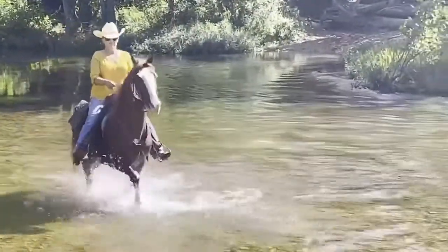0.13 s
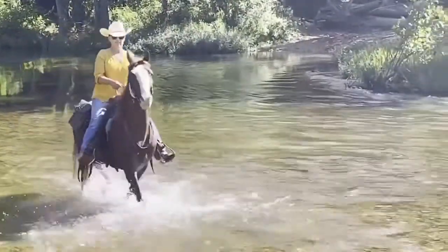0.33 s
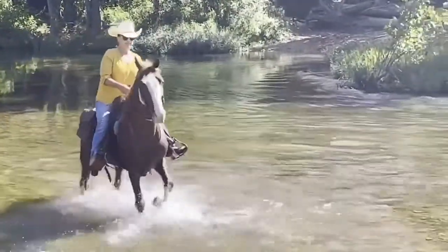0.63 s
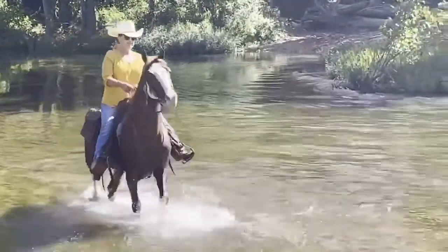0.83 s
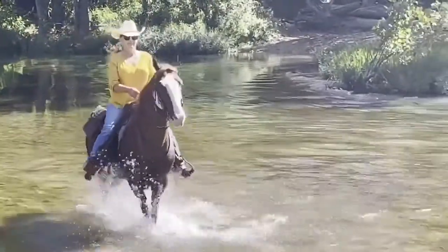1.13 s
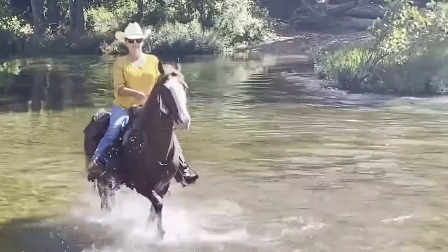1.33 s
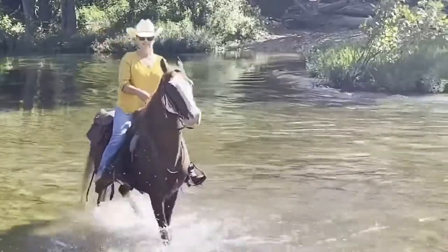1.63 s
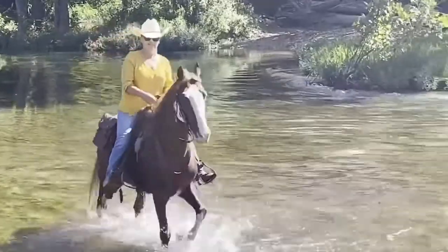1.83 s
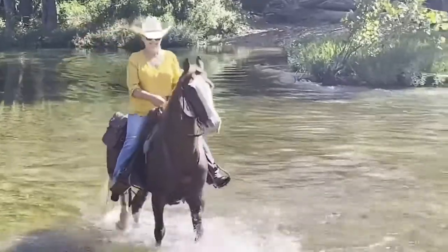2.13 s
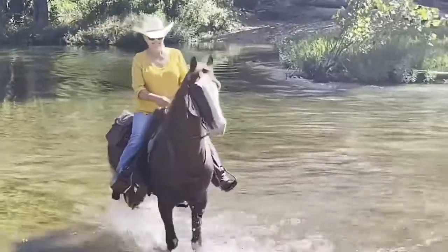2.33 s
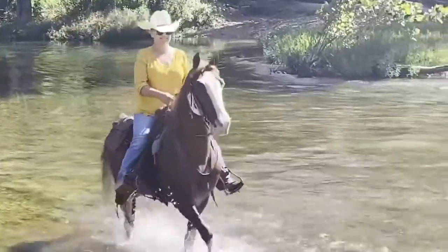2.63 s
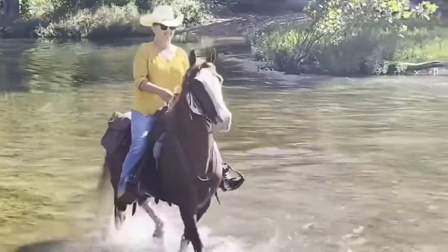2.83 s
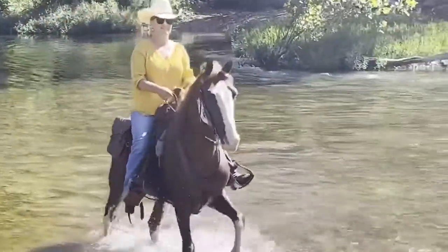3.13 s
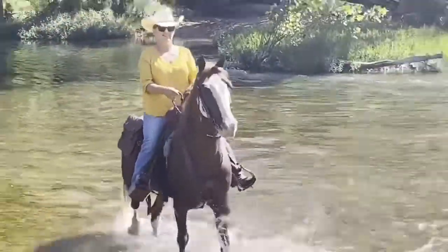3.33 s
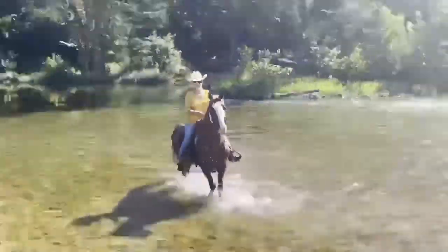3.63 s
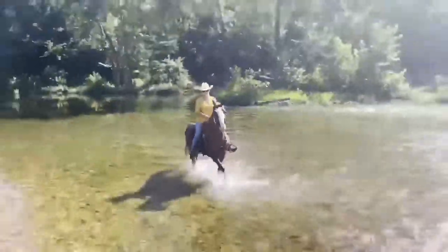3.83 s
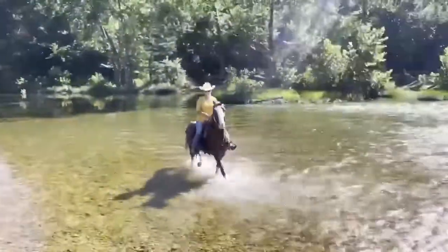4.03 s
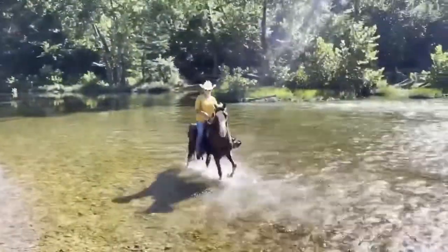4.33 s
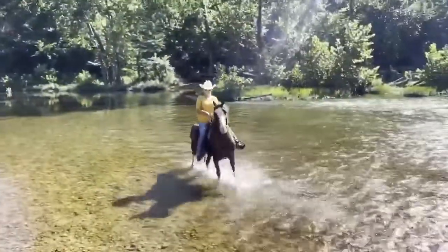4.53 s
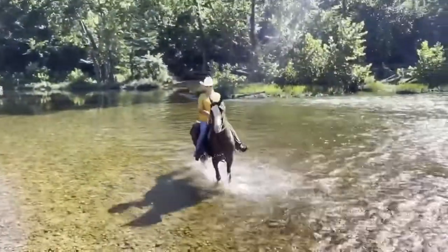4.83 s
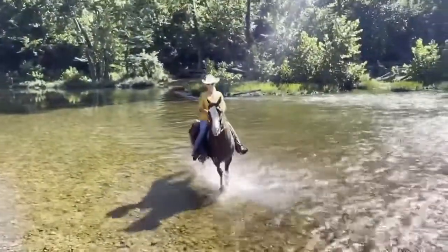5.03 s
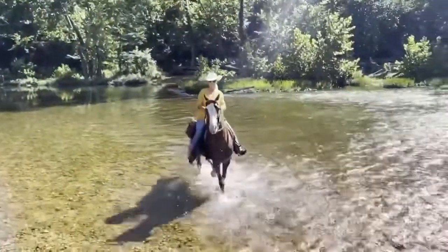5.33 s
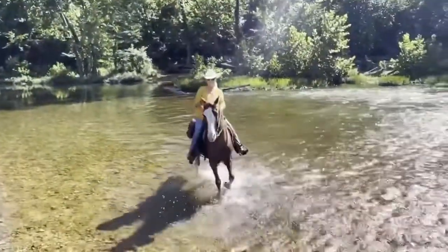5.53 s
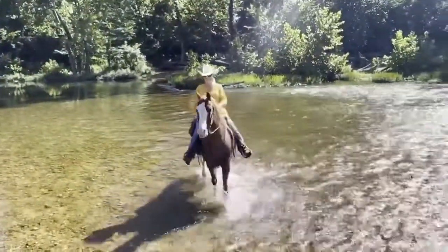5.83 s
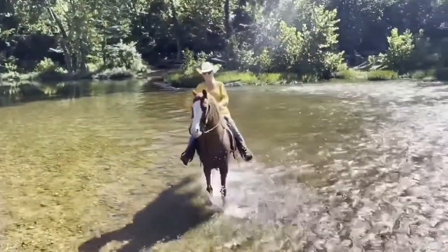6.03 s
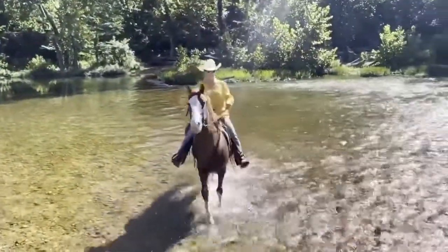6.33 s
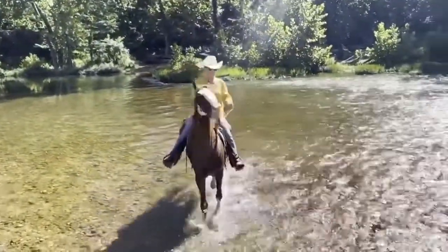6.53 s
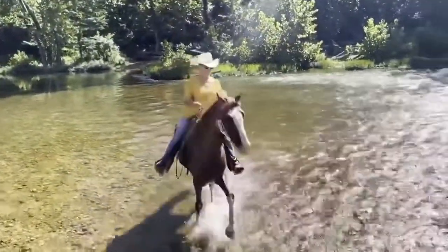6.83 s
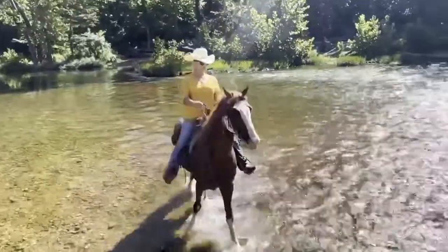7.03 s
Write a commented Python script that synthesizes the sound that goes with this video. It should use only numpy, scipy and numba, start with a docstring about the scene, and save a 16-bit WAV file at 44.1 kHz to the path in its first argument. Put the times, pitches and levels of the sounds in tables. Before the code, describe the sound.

A horse trots through a shallow creek, its hooves splashing and gulping in a steady rhythm over bubbling water.

```python
"""A horse trots through a shallow creek. Each hoof punches air into the water: big pockets gulp,
clouds of ringing bubbles thump and slosh, and thrown water slaps back in bursts of noise, with
drops and a fizzing mist on top. The creek keeps bubbling between steps, and a light wind rumbles
on the microphone. About halfway the listening spot changes, shifting the tone and stereo width."""
import sys
import numpy as np
from scipy import signal
from scipy.fft import rfft, irfft, next_fast_len
from scipy.io import wavfile
from scipy.ndimage import uniform_filter1d
from numba import njit

SR = 44100
rng = np.random.default_rng(int(sys.argv[2]) if len(sys.argv) > 2 else 0)


def persist_wave(psi):
    """Save psi, clipped to +-1, as 16-bit WAV."""
    counts = np.round(np.clip(psi, -1, 1) * 32767).astype(np.int16)
    wavfile.write(sys.argv[1], SR, np.atleast_2d(counts).T)


N = 316466
TIME_S = np.arange(N) / SR
CONTROL_S = np.arange(0, N / SR + .01, 1 / 500)  # coarse clock for envelopes


def gain_of(db):
    """Decibels as a linear gain."""
    return 10 ** (np.asarray(db) / 20)


def unit_rms(x):
    """Normalises to an RMS of one."""
    return x / np.sqrt(np.mean(x ** 2) + 1e-20)


def equalise(x, curve):
    """An EQ of straight dB lines on a log-frequency axis."""
    size = next_fast_len(N)
    curve_hz, curve_db = np.transpose(curve)
    hz = np.fft.rfftfreq(size, 1 / SR)
    eq_db = np.interp(np.log(hz + 1), np.log(curve_hz + 1), curve_db)
    return irfft(rfft(x, size) * gain_of(eq_db), size)[..., :N]


def faders(rows):
    """One gain per sample for each level column of a timed table."""
    times, *levels_db = np.transpose(rows)
    return [gain_of(np.interp(TIME_S, times, db)) for db in levels_db]


def envelope(power):
    """Power on the coarse clock as a gain per sample."""
    return np.interp(TIME_S, CONTROL_S, np.sqrt(power))


def bubble(hz, length_s, rise, phase):
    """Trapped air rings: it swells quickly, dies slower and climbs in pitch as it nears the surface."""
    half = round(2 * length_s * SR)
    age = np.arange(-half, half + 1) / (length_s * SR)  # in lengths, zero at the peak
    shape = np.exp(-4 * np.log(2) * (age / np.where(age < 0, .8, 1.25)) ** 2)
    return shape * np.cos(2 * np.pi * hz * length_s * (age + rise * age ** 2 / 2) + phase)


@njit
def add_rings(out, starts, kinds, gains, bank, lengths):
    """Mixes each chosen bubble in at its start sample."""
    for n in range(len(starts)):
        for k in range(lengths[kinds[n]]):
            out[starts[n] + k] += gains[n] * bank[kinds[n], k]


def bubble_cloud(low_hz, high_hz, per_s, cycles, rise, spread_db, count=40):
    """Bubbles ringing at random moments, a few of them loud: one cloud for mid, one for side."""
    pitches = np.geomspace(low_hz, high_hz, count)
    rings = [bubble(hz, cycles * (.6 + 0.72 * stretch) / hz, rise, 2 * np.pi * turn)
             for hz, (stretch, turn) in zip(pitches, rng.random((count, 2)))]
    lengths = np.array([len(ring) for ring in rings])
    pad = lengths.max()
    bank, out = np.zeros((count, pad)), np.zeros((2, N + 2 * pad))
    for k, ring in enumerate(rings):
        bank[k, :len(ring)] = ring * np.sqrt(pitches[k]) / np.linalg.norm(ring)  # equal power per Hz
    for channel in out:
        when, kind, size = rng.random((round(per_s * N / SR), 3)).T
        starts, kinds = (when * (N + pad)).astype(np.int64), (kind * count).astype(np.int64)
        gains = gain_of(spread_db * np.minimum(-np.log(1 - size), 5))
        add_rings(channel, starts, kinds, gains, bank, lengths)
    return out[:, pad:pad + N]


def swells(times, peaks_db, decay_s, attack_s=0.042, range_db=12.5, hold=1.18):
    """Power of a run of hits: each climbs range_db over its attack and loses it over its decay."""
    age = CONTROL_S[:, None] - times
    fall = np.where(age < 0, -age / attack_s, abs(age / np.maximum(decay_s, .01)) ** hold)
    return (gain_of(peaks_db - range_db * fall) ** 2).sum(1)


# Hoof hits on the trot beat, with weaker hind hooves and drags between:
# (time [s], decay [s], thump level [dB], gulp level [dB], slosh level [dB], drop level [dB])
HOOF_HITS = [(0.005, 0.067, -44, -36.5, -43, -61), (0.09, 0.23, -53.5, -43, -60, -54),
             (0.3, 0.31, -48.5, -37.5, -49, -57), (0.515, 0.033, -45, -41, -58, -63),
             (0.57, 0.055, -36, -35, -48, -49), (0.92, 0.15, -47.5, -40, -56, -46),
             (1.14, 0.27, -40.5, -42, -39, -45), (1.23, 0.11, -52, -40, -45, -62),
             (1.32, 0.051, -40, -54, -54, -45), (1.46, 0.26, -44, -43.5, -48, -63),
             (1.62, 0.044, -57, -38, -53, -41), (1.78, 0.13, -42, -36.5, -42.5, -65),
             (2.102, 0.15, -45, -36.5, -46, -61), (2.16, 0.099, -57, -37, -50, -60),
             (2.37, 0.18, -45.5, -36.5, -44, -44), (2.57, 0.31, -55, -45.5, -45.5, -56),
             (2.71, 0.23, -43, -38, -43, -57), (2.98, 0.2, -44, -33.5, -35.5, -54),
             (3.04, 0.077, -58, -29.5, -38, -61), (3.34, .1, -51, -40, -45, -45),
             (3.44, 0.085, -48, -35, -55, -62), (3.575, 0.32, -51, -32, -38.5, -41.5),
             (3.65, 0.063, -44, -40, -38, -55), (3.76, 0.13, -60, -58, -47, -41.5),
             (4.02, 0.17, -51, -43.5, -47, -61), (4.08, .1, -58, -44, -44, -60),
             (4.25, 0.21, -39.5, -34, -50, -42.5), (4.329, 0.047, -35.5, -27.5, -39, -48),
             (4.576, 0.11, -43, -34, -37, -41), (4.66, 0.072, -51, -39.5, -57, -61),
             (4.84, 0.17, -45.5, -35, -38, -43), (4.92, 0.22, -41, -55, -64, -52),
             (5.07, 0.038, -57, -63, -39, -44), (5.18, 0.21, -41.5, -41, -52, -37.5),
             (5.435, 0.079, -46, -45, -42, -43), (5.479, 0.32, -48, -34, -36, -47),
             (5.6, 0.22, -64, -36, -62, -68), (5.68, 0.033, -63, -37, -42, -62),
             (5.83, 0.082, -40.5, -35, -41, -53), (5.92, 0.1, -49, -49, -61, -62),
             (5.98, 0.034, -49, -50, -61, -56), (6.101, 0.078, -44, -30.5, -40, -46),
             (6.2, 0.087, -41.5, -42, -40, -48), (6.42, 0.2, -49, -32, -40, -39),
             (6.54, 0.11, -60, -42, -46, -60), (6.62, 0.057, -64, -39, -39.5, -43),
             (6.73, 0.25, -47, -37.5, -43, -44.5), (6.84, 0.042, -48, -42, -46, -54),
             (6.915, 0.045, -53, -51, -54, -41), (6.949, 0.37, -42, -35.5, -37, -36.5)]


def hoof_plunges():
    """Power the hooves put into each bubble layer: big bubbles come later and outlast small ones."""
    times, decay_s, *layers_db = np.transpose(HOOF_HITS)
    decay_shares, lags_s = (0.67, 0.52, 0.37, 0.24), (-0.0019, 0.00066, -0.011, -0.0095)
    return [swells(times + lag_s, db, decay_s * share)
            for db, share, lag_s in zip(layers_db, decay_shares, lags_s)]


def lapping(depth_db=1.5, lap_s=0.056):
    """A wandering gain: small sloshes make the calm water come and go."""
    window = np.exp(-(np.linspace(-.2, .2, num=201) / lap_s) ** 2)
    wander = np.convolve(rng.standard_normal(len(CONTROL_S)), window, "same")
    return envelope(gain_of(depth_db * unit_rms(wander)) ** 2)


def patchy_shimmer(x, depth_db=1.76, full_above_hz=910):
    """A patchy shimmer in the upper water sound: small random patches of pitch and time swell and fade."""
    hz, _, spectrum = signal.stft(x, SR, nperseg=1024)
    noise = rng.standard_normal(spectrum.shape[1:])
    patches = unit_rms(uniform_filter1d(uniform_filter1d(noise, size=4, axis=0), size=4, axis=1))
    patches_db = depth_db * np.clip(hz / full_above_hz, 0, 1)[:, None] * patches
    _, shimmering = signal.istft(spectrum * gain_of(patches_db), SR, nperseg=1024)
    return unit_rms(shimmering[:, :N]) * np.sqrt(np.mean(x ** 2))


# Bubble layers, from low body to top sparkle:
# (lowest [Hz], highest [Hz], density [1/s], nominal ring [cycles], pitch rise [share], spread [dB])
THUMPS = (100.4, 194.4, 250, 2.8, 0.17, 0.35)
GULPS = (210, 613.5, 700, 4.5, 0.22, 3.66)
SLOSH = (582.5, 1498, 1500, 3.45, 0.25, 1.23)
DROPS = (1450, 4700, 5000, 6.5, 0.17, 1.2)
PLINKS = (951, 4800, 270, 12, 0.042, 5.8)  # sparse drops that ring longer
MIST = (3980, 10470, 30000, 5.6, 0.34, 1.7)
# Tone of the mist: (frequency [Hz], gain [dB])
MIST_EQ = [(4000, 4.5), (5200, 2.5), (6600, 3), (7600, -7.5), (9400, -13), (10400, -4.5), (11500, -0.5)]
# The bed of water between plunges:
# (time [s], thump level [dB], gulp level [dB], slosh level [dB], drop level [dB], mist level [dB])
WATER_BED = [(0.0, -68, -46, -46, -45.5, -49), (0.2, -60, -50.5, -44, -44.5, -47.5),
             (0.55, -60, -46, -44, -45.5, -48), (0.86, -53, -47.5, -43, -43.5, -48),
             (1.04, -62, -42, -46.5, -45.5, -48), (1.4, -60, -47.5, -44.5, -43.5, -47.5),
             (1.84, -45, -46.5, -45.5, -45, -48), (2.21, -55, -48.5, -46, -46, -50.5),
             (2.81, -58, -48.5, -44.5, -42, -46), (3.31, -61, -48, -45, -47, -51.5),
             (3.53, -48, -44.5, -45, -45, -50), (3.83, -57, -48.5, -40.5, -46, -48.5),
             (4.53, -56, -49.5, -46, -46, -49.5), (5.01, -64, -48, -43, -44, -47.5),
             (6.09, -54, -50, -46, -45.5, -48), (6.51, -58, -49.5, -43, -44.5, -48),
             (7.17, -63, -39.5, -42, -47, -50)]


def churning_water(plink_db=-12, mist_follow=0.66):
    """Four bubble layers surge with the hooves; plinks ride the drops, and the mist partly follows."""
    surges = hoof_plunges()
    surges[-1] = surges[-1] + slap_showers()
    *beds, mist_bed = faders(WATER_BED)
    gains = [np.hypot(bed * lapping(), envelope(power)) for bed, power in zip(beds, surges)]
    drop_gain, drop_bed = gains[-1], beds[-1]
    bubbles = sum(water_tone(bubble_cloud(*layer)) * gain
                  for layer, gain in zip([THUMPS, GULPS, SLOSH, DROPS], gains))
    plinks = gain_of(plink_db) * water_tone(bubble_cloud(*PLINKS)) * drop_gain
    water = patchy_shimmer(bubbles + plinks)
    mist = unit_rms(equalise(bubble_cloud(*MIST), MIST_EQ))
    return water + mist * mist_bed * (drop_gain / drop_bed) ** mist_follow


# Tone of the water at each listening spot: (frequency [Hz], gain [dB])
FIRST_SPOT_EQ = [(60, -9), (100, -13), (160, -1.5), (300, -3.5), (430, -3), (600, -8), (1100, -8),
                 (1420, -16), (1900, -5), (2300, -8.5), (3600, -10), (5000, -20.5)]
SECOND_SPOT_EQ = [(60, -28), (100, -19.5), (160, -5), (300, 0.5), (430, -1), (600, -9.5), (1100, -11),
                  (1300, -13), (1480, -20.5), (1680, -11), (2300, -7.5), (2750, -9), (5000, -15)]


def water_tone(x):
    """Colours the bubbles for each spot, with a dip from the bounce off the surface."""
    return change_spot(unit_rms(equalise(x, FIRST_SPOT_EQ)), unit_rms(equalise(x, SECOND_SPOT_EQ)))


# Gusts: (time [s], level [dB])
GUSTS = [(0.0, -60), (0.56, -59), (0.58, -47), (0.76, -60), (1.2, -63), (1.3, -53), (1.4, -68),
         (1.44, -56.5), (2.14, -57), (2.25, -61), (2.29, -50.5), (2.72, -56), (3.01, -39.5), (3.15, -58),
         (3.33, -40.5), (3.43, -55), (3.51, -39), (3.57, -49.5), (5.39, -55.5), (6.27, -53), (7.13, -60),
         (7.17, -61)]
# Tone of the rumble: (frequency [Hz], gain [dB])
RUMBLE_EQ = [(12, -50), (20, -12), (48, 13), (92, 7), (130, -3.5), (170, -26), (290, -120)]


def wind():
    """Gusts push low, lumpy pressure onto the microphone."""
    rumble = unit_rms(equalise(rng.standard_normal((2, N)), RUMBLE_EQ))
    return rumble * faders(GUSTS)[0]


# Featured air pockets: (peak time [s], pitch [Hz], level [dB], length at half height [ms])
AIR_POCKETS = [(0.012, 226, -31.5, 16), (0.128, 3160, -34, 2), (0.152, 680, -37, 7.3),
               (0.287, 890, -31, 4.3), (0.299, 2000, -35, 3), (0.293, 265, -22.5, 5.4),
               (0.557, 299, -17, 9.6), (0.566, 814, -33, 5.9), (0.585, 324, -27, 26),
               (0.732, 4460, -34, 2.3), (0.752, 1710, -33, 5), (0.752, 1060, -34, 4),
               (0.878, 284, -26.5, 6.2), (0.917, 340, -30, 6), (0.939, 280, -26, 12), (0.954, 310, -32, 8),
               (0.976, 307, -30.5, 15), (1.004, 300, -34, 7), (1.058, 2480, -32, 2.5),
               (1.129, 288, -21.5, 12.3), (1.139, 448, -29, 10), (1.161, 233, -33, 22),
               (1.282, 3350, -30, 1.2), (1.51, 1860, -28, 2.7), (1.539, 2100, -33, 2.1),
               (1.634, 2510, -31, 1.5), (1.635, 948, -32, 3.8), (1.668, 1130, -31, 2.3),
               (1.668, 2000, -31, 2), (1.719, 208, -28.5, 8.9), (1.746, 1830, -36, 5.5),
               (1.76, 510, -28.5, 12), (1.776, 436, -29, 14), (1.777, 223, -28.5, 18),
               (1.811, 242, -31.5, 18), (1.832, 428, -29.5, 9.6), (1.928, 1170, -25, 3.5),
               (2.081, 285, -24.5, 7.3), (2.103, 905, -31, 6), (2.103, 490, -29, 6), (2.104, 250, -27, 8),
               (2.105, 666, -26.5, 8), (2.131, 670, -33, 10), (2.135, 323, -30.5, 20), (2.155, 318, -28, 8),
               (2.354, 2120, -28.5, 1.8), (2.357, 905, -25, 4.5), (2.357, 467, -25.5, 6.2),
               (2.381, 550, -35, 9.5), (2.397, 217, -31, 15), (2.548, 3750, -35, 1.6),
               (2.645, 1890, -34, 3.1), (2.656, 3900, -33, 1.6), (2.692, 401, -37, 8.9),
               (2.693, 1070, -36, 9), (2.722, 645, -31, 5.8), (2.73, 286, -29.5, 23),
               (2.738, 3540, -32, 1.6), (2.744, 319, -36, 9.2), (2.765, 846, -33, 4.9),
               (2.826, 2330, -25, 1.1), (2.964, 1870, -27, 3.5), (2.964, 4400, -36, 3),
               (2.967, 464, -20.5, 4.7), (2.968, 1950, -22.5, 1.6), (2.983, 305, -23, 7.1),
               (2.999, 464, -27, 9.9), (3.019, 318, -29, 31), (3.327, 293, -25, 11), (3.352, 290, -30, 10),
               (3.367, 285, -25.5, 10), (3.39, 487, -33, 11), (3.532, 147, -31, 16),
               (3.557, 2000, -22.5, 5.6), (3.558, 524, -15.5, 2.6), (3.571, 546, -19.5, 8.7),
               (3.572, 960, -27, 7.2), (3.58, 255, -18.5, 7.6), (3.604, 260, -25.5, 10),
               (3.626, 1160, -30.5, 9), (3.63, 270, -32, 14), (3.659, 300, -27, 9.7), (3.784, 1600, -34, 4),
               (3.987, 4300, -33.5, 3.6), (3.996, 1340, -35, 3.5), (4.021, 400, -37.5, 20),
               (4.069, 635, -32, 6.4), (4.128, 530, -31.5, 5.9), (4.251, 1890, -30, 1.6),
               (4.253, 1066, -23.5, 11), (4.253, 500, -20.5, 5.5), (4.257, 268, -31, 18),
               (4.322, 513, -30, 14), (4.571, 2460, -21.5, 2.4), (4.604, 650, -32, 9),
               (4.605, 314, -26, 16), (4.656, 319, -35, 9.7), (4.802, 905, -32.5, 8),
               (4.84, 2120, -29, 2.6), (4.82, 358, -34, 17), (4.852, 300, -26, 12), (4.869, 190, -36, 11),
               (4.886, 1630, -30.5, 5.5), (4.91, 270, -33, 18), (4.932, 205, -36, 15),
               (4.942, 2820, -32, 1.6), (5.04, 1550, -36, 6), (5.116, 2370, -34, 2.5),
               (5.18, 3970, -23.5, 5.6), (5.178, 170, -30, 9), (5.18, 260, -32, 7), (5.196, 416, -34, 14),
               (5.438, 680, -30, 7.8), (5.452, 170, -36, 14), (5.47, 910, -26.5, 7.8),
               (5.478, 230, -31, 6.7), (5.487, 466, -28, 3.9), (5.521, 4430, -29, 1), (5.553, 334, -34, 14),
               (5.592, 428, -31, 7.6), (5.635, 300, -30.5, 13), (5.653, 2510, -35, 2),
               (5.674, 322, -34, 16), (5.751, 290, -37, 9), (5.78, 645, -33, 8), (5.783, 310, -29, 5),
               (5.78, 2240, -27.5, 1.6), (5.788, 168, -29, 8), (5.822, 1000, -32, 5.5),
               (5.832, 404, -21, 16), (5.877, 295, -31.5, 12), (5.94, 407, -37.5, 32),
               (5.976, 2000, -32, 2.2), (6.063, 2610, -28, 1.1), (6.086, 1220, -32, 4),
               (6.093, 328, -29, 8), (6.1, 630, -30, 8), (6.113, 570, -25, 6), (6.114, 312, -21, 12.4),
               (6.118, 174, -32, 15), (6.232, 712, -36.5, 7.6), (6.298, 263, -35, 15),
               (6.395, 323, -24.5, 4), (6.393, 1200, -33.5, 9), (6.404, 770, -23.5, 7), (6.41, 310, -29, 9),
               (6.414, 600, -30, 8), (6.422, 3750, -27, 1.6), (6.429, 770, -27.5, 9.7),
               (6.432, 450, -25, 7.3), (6.434, 1840, -24, 1.2), (6.45, 3970, -23.5, 0.51),
               (6.454, 390, -31, 11), (6.468, 590, -26, 7), (6.486, 387, -23.5, 16), (6.522, 360, -33, 19),
               (6.56, 423, -34, 9.6), (6.62, 417, -33, 11), (6.71, 430, -33, 14), (6.743, 2380, -32, 2.5),
               (6.744, 865, -24, 6), (6.751, 213, -38, 20), (6.801, 231, -31.5, 14), (6.808, 500, -31.5, 8),
               (6.861, 337, -35, 16.5), (6.915, 1190, -30, 3.5), (6.919, 2000, -37, 1.8),
               (6.92, 266, -30, 9.9), (6.941, 3800, -17, 1.04), (6.944, 4080, -22, 2.6),
               (6.941, 1070, -19.5, 1.7), (6.947, 3030, -27, 2.5), (6.942, 5200, -30, 1.2),
               (6.952, 2170, -27, 5.4), (6.954, 1085, -20, 5.5), (6.958, 504, -21, 6.4),
               (6.962, 3970, -26, 1.8), (6.968, 1004, -29, 4.8), (6.976, 1230, -29, 4.4),
               (6.999, 940, -31, 9), (7.011, 353, -29.5, 26), (7.025, 387, -24.5, 9),
               (7.049, 3800, -28.5, 1.5), (7.084, 224, -28, 14), (7.155, 292, -33, 8.8)]


def air_pockets(shed_db=-12, shed_spread=0.23, shake_depth=0.19, shake_s=0.0039):
    """Pockets dragged under by a hoof ring with shaking walls; each sheds a weaker one of nearby pitch."""
    out, draws = np.zeros(N + 2 * SR), rng.random((len(AIR_POCKETS), 4))
    smooth = round(shake_s * SR)
    shake = unit_rms(uniform_filter1d(uniform_filter1d(rng.standard_normal(N), smooth), smooth))
    for (time_s, hz, db, ms), (turn, shed_turn, detune, late) in zip(AIR_POCKETS, draws):
        shed_s = time_s + (.5 + late) * ms / 1000
        shed_hz = hz * (1 + shed_spread * (2 * detune - 1))
        pair = [(time_s, hz, db, turn), (shed_s, shed_hz, db + shed_db, shed_turn)]
        for peak_s, ring_hz, ring_db, ring_turn in pair:
            ring = gain_of(ring_db) * bubble(ring_hz, ms / 1000, rise=0.017, phase=2 * np.pi * ring_turn)
            span = (round(peak_s * SR) + np.arange(len(ring))) % N
            shaken = ring * (1 + shake_depth * shake[span])
            start = round((1 + peak_s) * SR) - len(ring) // 2
            out[start:start + len(ring)] += shaken * np.linalg.norm(ring) / np.linalg.norm(shaken)
    return out[SR:SR + N]


# Sheets of thrown water landing: (time [s], level before trim [dB], brightness [dB/octave])
WATER_SLAPS = [(0.285, -25, -15), (0.368, -23, -7), (0.75, -26, -3), (0.774, -25.5, -4), (1.507, -33, -8),
               (1.633, -26, -3.5), (1.667, -26.5, -3), (1.742, -24, -12), (1.926, -19, -6.5),
               (2.101, -24, -7.5), (2.353, -28, -10), (2.53, -27, 0), (2.567, -28, -10), (2.643, -31, -6),
               (2.72, -22, -8), (2.765, -23, -6), (2.825, -27, -9), (2.962, -28, -5.5), (3.313, -20, -10.5),
               (3.492, -25, -11), (3.52, -23.5, -6), (3.555, -21, -7), (3.985, -30.5, 5), (4.235, -27, -11),
               (4.248, -26, -8), (4.446, -29.5, 14), (4.882, -33, 4), (5.083, -20.5, -3),
               (5.179, -24.5, -7), (5.465, -20, -8), (5.482, -24, -6), (5.793, -19.5, -5.5),
               (5.821, -22.5, -5.5), (5.975, -25, -3), (6.063, -25, -6), (6.084, -25, -8), (6.108, -31, -6),
               (6.391, -22, -7), (6.415, -23, -9), (6.44, -27, -3), (6.74, -28.5, 8), (6.898, -31, 0),
               (6.911, -24, 1), (6.922, -27, -4), (6.94, -20.5, 1.5), (6.959, -28, -4), (7.047, -32, 3)]


def water_slaps(trim_db=-12.5, attack_s=0.00052, tail_t60_s=0.14, crack_db=-6.5, crack_t60_s=0.016):
    """Thrown water smacks the surface: a burst of noisy spatter with a short crack on top."""
    out, size = np.zeros((2, N + SR)), 4096
    t = np.arange(size) / SR
    decay = gain_of(-60 * t / tail_t60_s) + gain_of(crack_db - 60 * t / crack_t60_s)
    burst = np.minimum(t / attack_s, 1) * decay
    octaves = np.log2(np.fft.rfftfreq(size, 1 / SR) / 1500 + 1e-3)  # from the 1500 Hz tilt pivot
    low_cut_db = 14 * np.maximum(-.9 - octaves, 0) + 18 * np.maximum(-2.8 - octaves, 0)
    high_cut_db = 30 * np.maximum(octaves - 1.8, 0)
    for time_s, db, tilt_db in WATER_SLAPS:
        tone = gain_of(tilt_db * octaves - low_cut_db - high_cut_db)
        spatter = unit_rms(irfft(rfft(rng.standard_normal((2, size))) * tone))
        start = round(time_s * SR)
        out[:, start:start + size] += gain_of(db + trim_db) * burst * spatter
    return out[:, :N]


def slap_showers(shower_db=-23.5, decay_s=0.031):
    """Each slap scatters drops: a brief surge of power for the drop layer."""
    times, slap_db, _ = np.transpose(WATER_SLAPS)
    return swells(times, slap_db + shower_db, decay_s)


def change_spot(first, second, start_s=3.76, fade_s=0.2):
    """Crossfades from the first listening spot to the second."""
    fade = np.clip((TIME_S - start_s) / fade_s, 0, 1)
    return (1 - fade) * first + fade * second


# Stereo lean at each spot: (frequency [Hz], mid in phase [share], mid a quarter turn ahead [share])
FIRST_SPOT_LEAN = [(150, 0.0091, 0.071), (320, 0.022, 0.029), (600, 0.043, -0.064), (800, -0.089, -0.062),
                   (1100, 0., 0.018), (1300, .12, -0.022), (1500, -.1, -.35), (1900, -0.15, -0.1),
                   (2190, 0., 0.), (5200, 0., 0.), (7260, 0., -0.62), (8700, 0., .02), (10000, 0., .23),
                   (10700, 0., 0.)]
SECOND_SPOT_LEAN = [(300, -0.00036, 0.), (470, 0.01, -0.076), (620, 0.13, -0.47), (780, -0.39, -0.29),
                    (920, -0.053, 0.12), (1200, 0.067, -0.037), (1500, -0.071, -0.27), (2050, -0.049, 0.1),
                    (2900, .16, .18), (4600, .16, -0.09), (5500, 0.23, -.07), (7500, -0.099, -.12),
                    (8700, .02, .02), (10000, 0., .22), (10700, 0., 0.)]


def stereo_lean(mid):
    """Side signal from sound reaching one side of the microphone louder or earlier than the other."""
    size = next_fast_len(N)
    hz, spectrum = np.fft.rfftfreq(size, 1 / SR), rfft(mid, size)
    sides = []
    for curve in (FIRST_SPOT_LEAN, SECOND_SPOT_LEAN):
        curve_hz, in_phase, ahead = np.transpose(curve)
        response = np.interp(hz, curve_hz, in_phase + 1j * ahead, right=0)
        sides.append(irfft(spectrum * response, size)[:N])
    return change_spot(*sides)


# Stereo width at each spot: (frequency [Hz], side gain [dB])
FIRST_SPOT_WIDTH = [(30, -20), (70, -29), (130, -45), (300, -26), (600, -15), (1000, -15), (1450, 1.5),
                    (1900, -11.5), (2150, -59), (5600, -59), (6300, -11), (8500, 6.5), (10200, 0.5),
                    (10600, -43)]
SECOND_SPOT_WIDTH = [(30, -26), (70, -12.5), (130, -27), (300, -50), (500, -11.5), (1000, -11),
                     (1450, -2.5), (2300, -11.5), (3000, -5), (5000, -5), (6500, -3), (8500, 8),
                     (10200, 3.5), (10600, -45)]


def stereo_width(side):
    """Sound scattered to the sides: its upper mids open up at the second spot."""
    return change_spot(equalise(side, FIRST_SPOT_WIDTH), equalise(side, SECOND_SPOT_WIDTH))


def scene():
    """Mixes water and wind in mid and side, air pockets in the mid, then decodes to left and right."""
    mid, side = churning_water() + water_slaps() + wind()
    mid = mid + air_pockets()
    side = stereo_width(side) + stereo_lean(mid)
    return np.array([mid + side, mid - side])


def record(dry):
    """A steep low-pass at 11880 Hz takes the air off the top."""
    low_pass = signal.firwin(1023, 11880, window=("kaiser", 9), fs=SR)
    return signal.oaconvolve(dry, low_pass[None], "same")


dry = scene()
out = record(dry)
persist_wave(out)
```